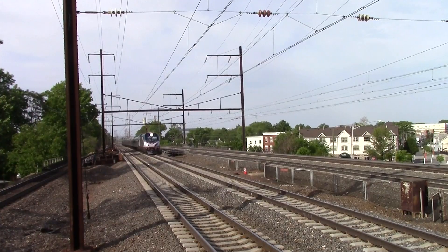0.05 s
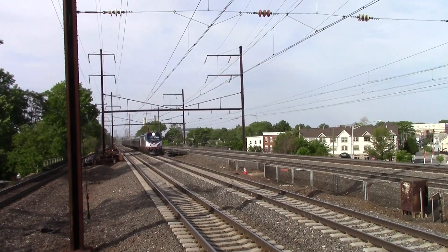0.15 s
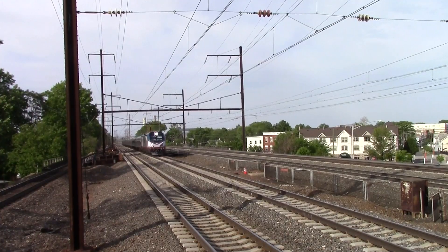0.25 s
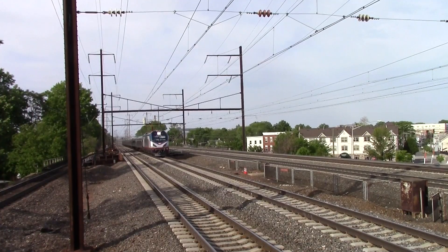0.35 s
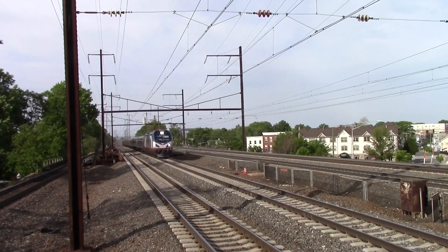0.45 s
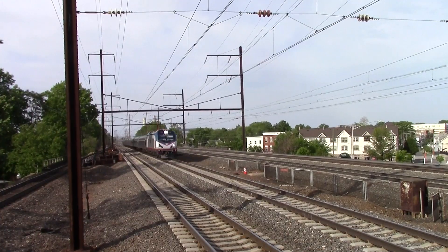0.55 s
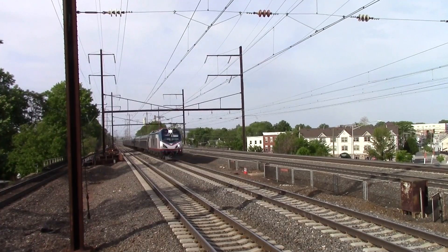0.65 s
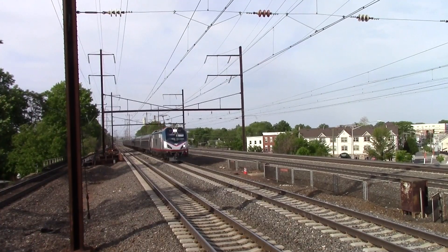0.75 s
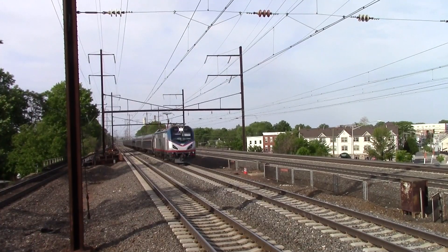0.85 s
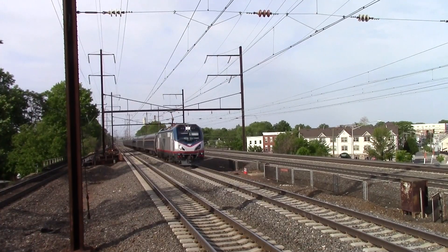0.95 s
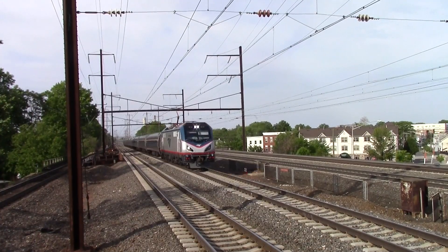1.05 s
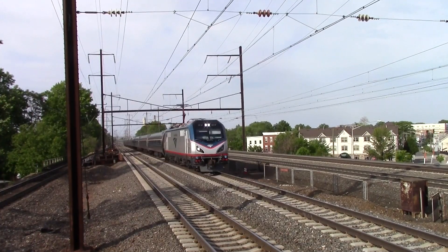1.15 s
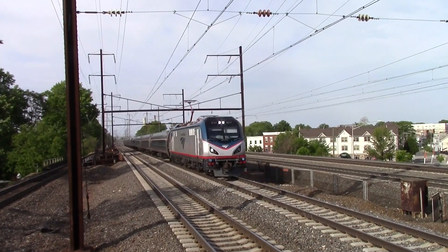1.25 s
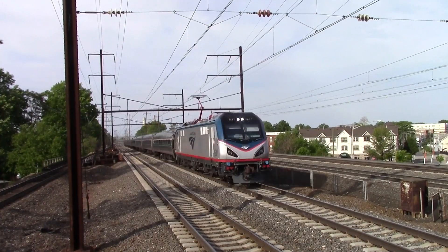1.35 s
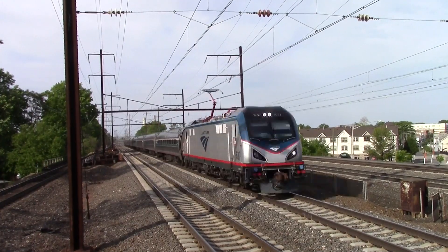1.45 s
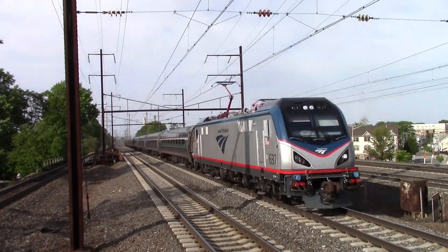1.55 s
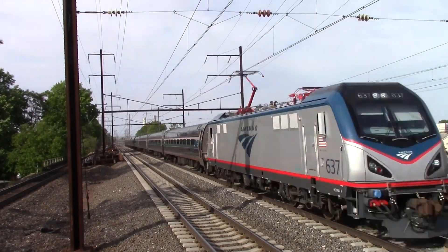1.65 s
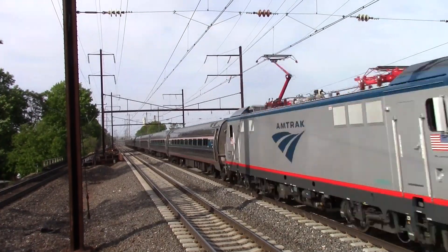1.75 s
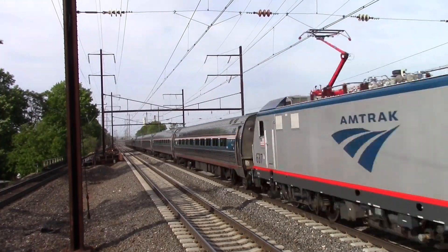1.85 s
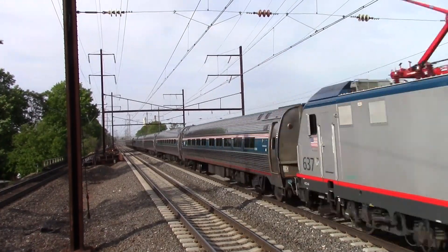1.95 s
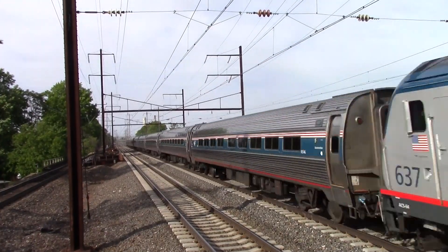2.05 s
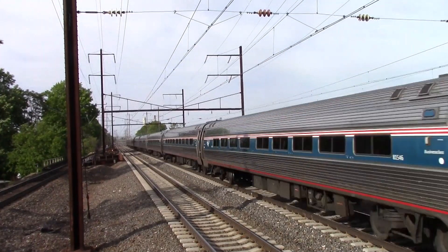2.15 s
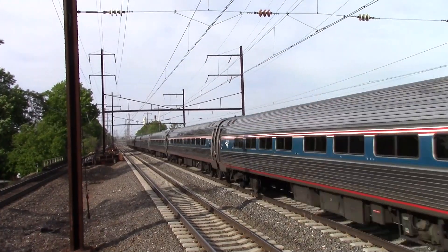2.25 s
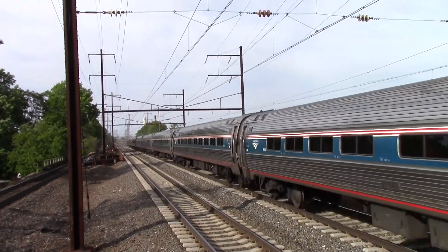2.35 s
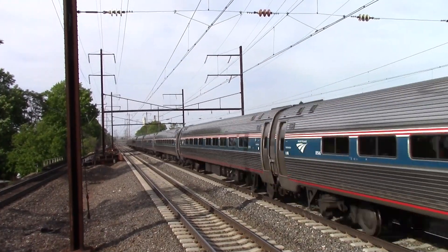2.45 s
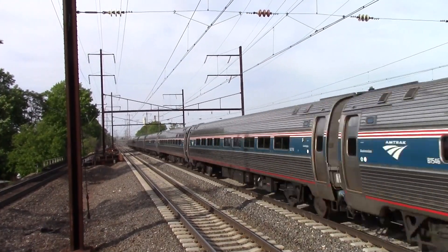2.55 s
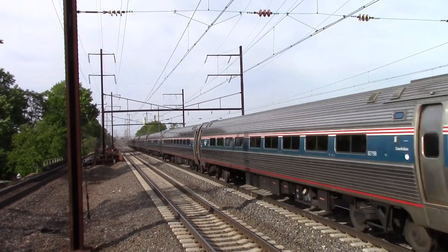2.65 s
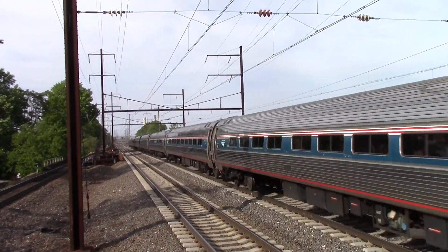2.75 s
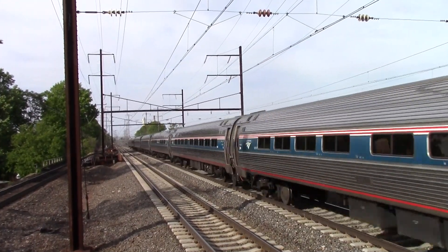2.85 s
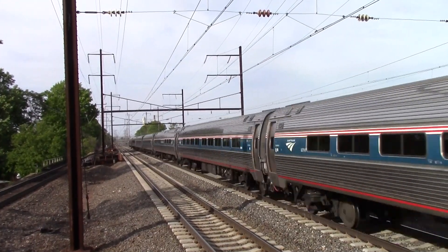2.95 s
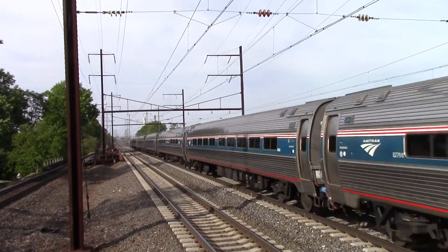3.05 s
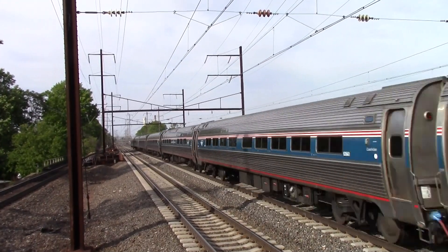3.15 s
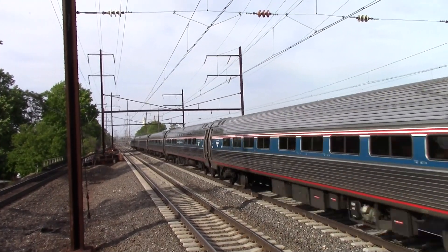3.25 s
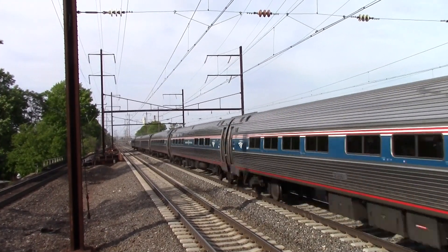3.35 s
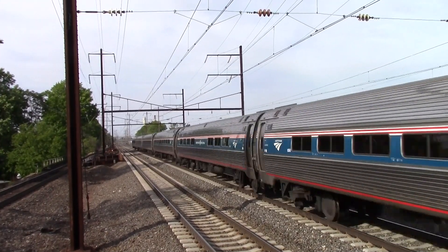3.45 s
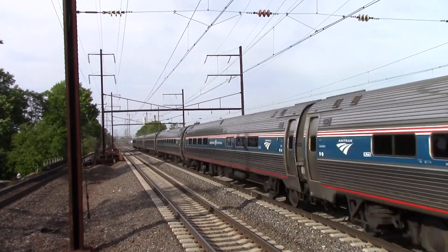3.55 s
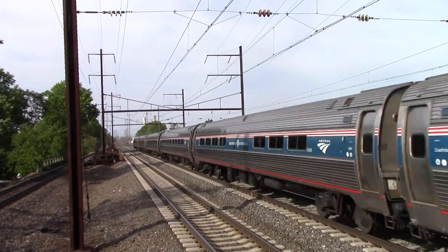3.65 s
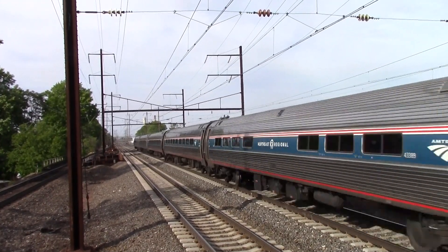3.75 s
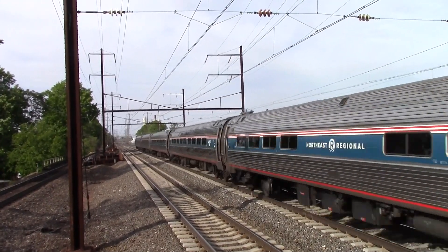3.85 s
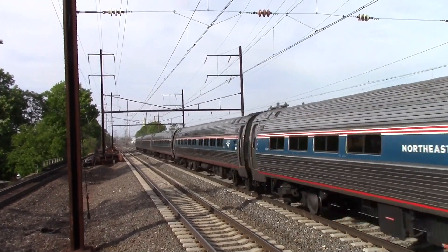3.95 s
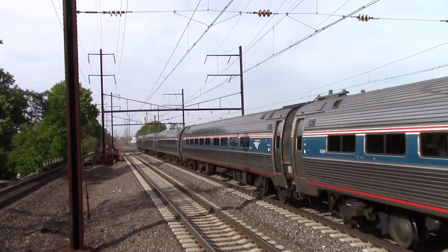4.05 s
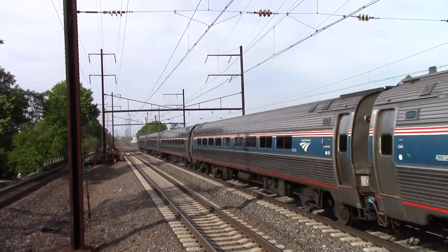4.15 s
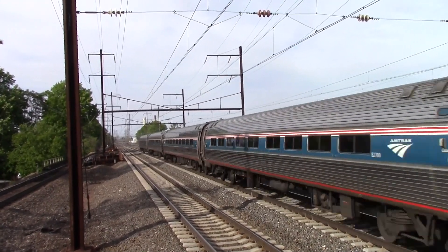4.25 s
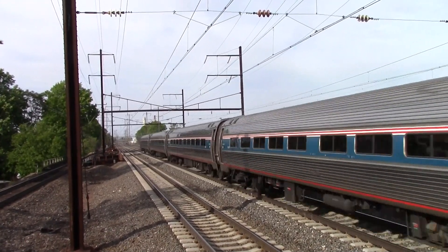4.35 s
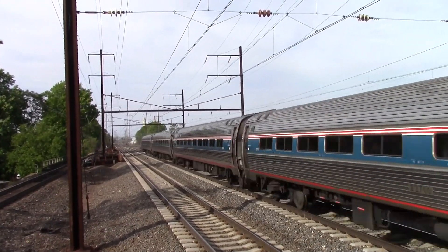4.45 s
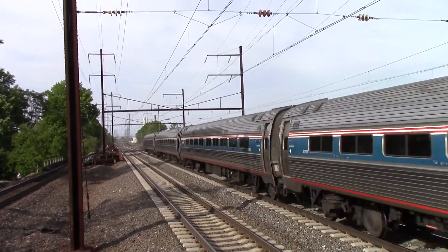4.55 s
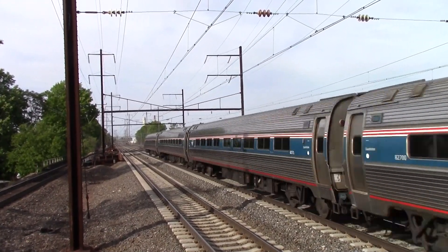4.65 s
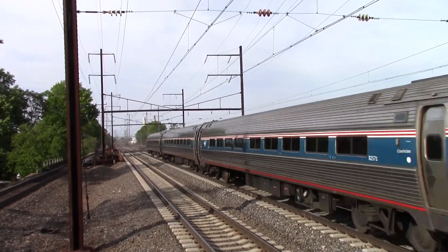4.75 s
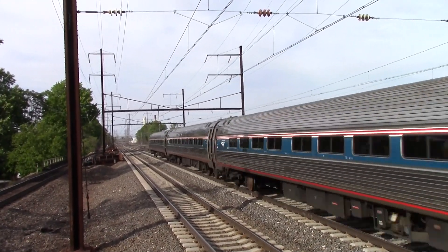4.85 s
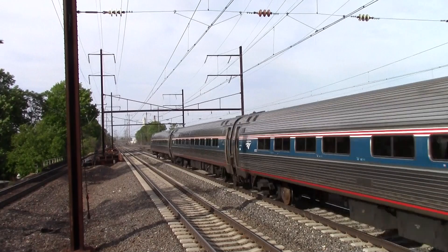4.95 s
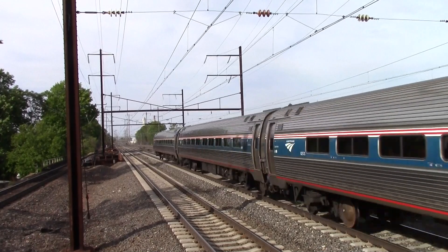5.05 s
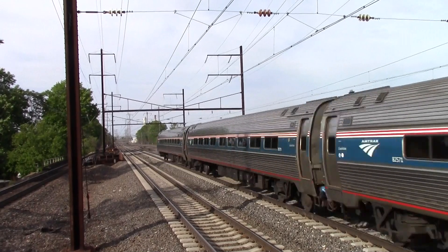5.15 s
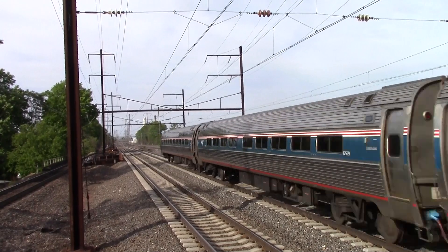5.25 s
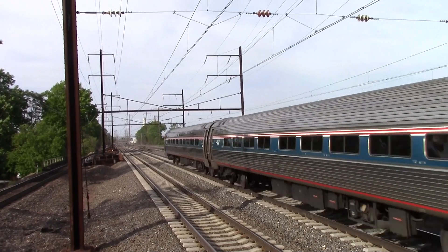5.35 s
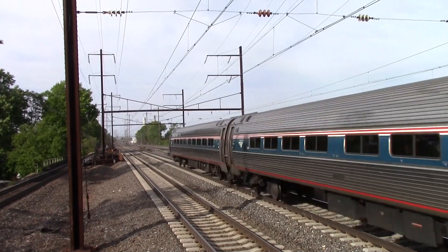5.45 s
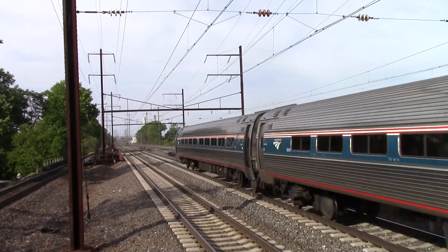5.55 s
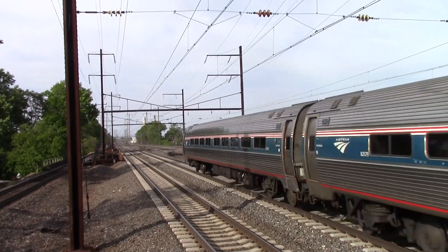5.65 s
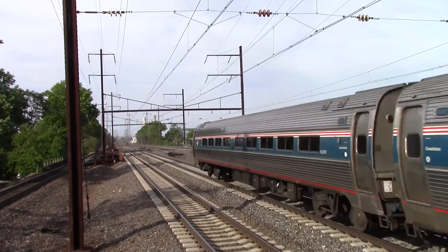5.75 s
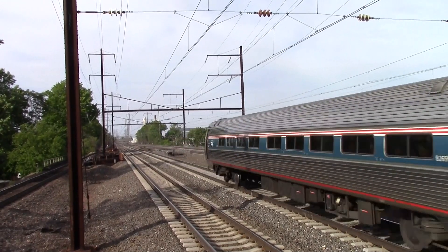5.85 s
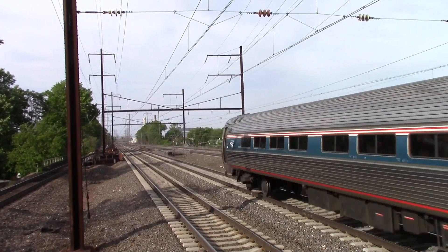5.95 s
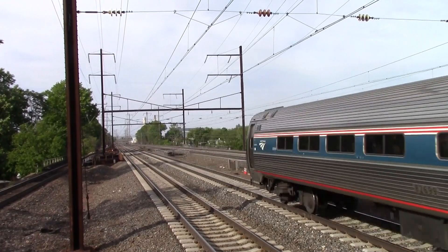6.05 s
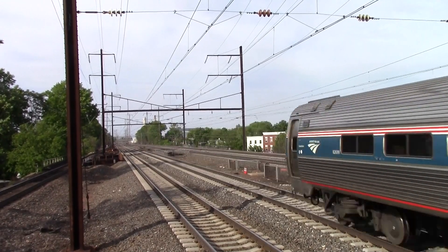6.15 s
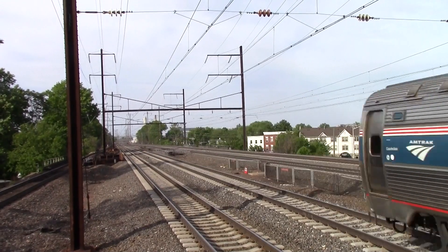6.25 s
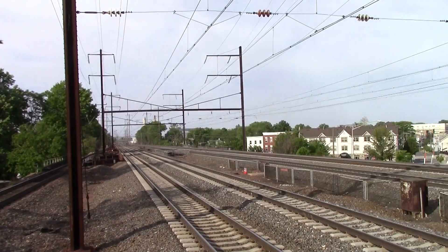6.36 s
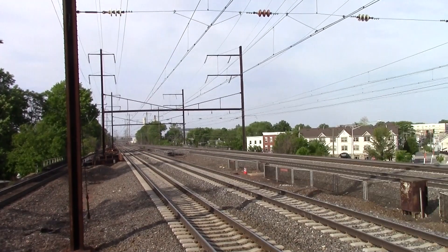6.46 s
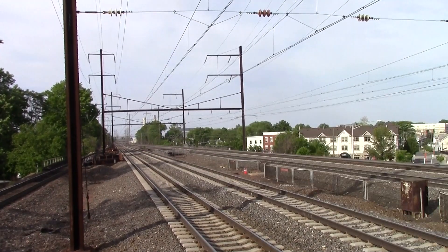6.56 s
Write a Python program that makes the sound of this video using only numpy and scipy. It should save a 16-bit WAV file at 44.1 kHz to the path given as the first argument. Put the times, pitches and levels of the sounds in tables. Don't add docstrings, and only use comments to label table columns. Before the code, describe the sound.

Open air beside a railway line, heard through a small stereo camera microphone with steady hiss, faint high whistles and little bass. From 0 to 1 second the rails sing softly, a ghostly trace of an earlier horn fades, and distant wheel roar grows. At about 1.0 a brassy five-note horn bursts out, buzzing and fluttering, getting fuller until it breaks off around 1.9 with a slight drop in pitch. The locomotive sweeps past from 1.8 to 2.5 with a heavy rough roar, clanks and short motor whines. From 2.6 the roar settles lower while coaches pass, paired axles clacking over joints roughly twice a second, with ringing steel, loose knocks and air hissing at car ends. Bass thins from 2.75 to 4.2. After 5.4 the roar rises again, and dense, hard, overloaded clatter runs from 5.9 until the end near 6.6.

```python
import sys
import numpy as np
from scipy import signal
from scipy.fft import rfft, irfft, next_fast_len
from scipy.io import wavfile
from scipy.ndimage import uniform_filter1d, map_coordinates

SR = 44100
rng = np.random.default_rng(int(sys.argv[2]) if len(sys.argv) > 2 else 0)


def wav_record(signal):
    frames = np.transpose(np.atleast_2d(signal))
    bounded = np.clip(frames, -1, 1)
    quanta = np.round(bounded * 32767).astype(np.int16)
    wavfile.write(sys.argv[1], SR, quanta)


def volts(x):
    e = np.asarray(x, float) / 20
    return 10 ** e


N = 290751

# start and end in seconds, pitch in Hz, line width in Hz, level in dB.
WHINES = [(-.5, .6, 1410, 90, -40), (.35, 1.05, 1430, 90, -36.5), (.9, 1.0, 1120, 60, -33),
          (.2, .5, 1800, 150, -40), (.6, 1.0, 1135, 50, -42), (1.9, 1.985, 1530, 150, -11),
          (1.87, 1.9, 1950, 500, -14), (1.97, 2.06, 700, 60, -29), (2.09, 2.15, 1500, 200, -13.5),
          (2.17, 2.23, 1560, 200, -13.5), (2.12, 2.24, 1310, 150, -19), (2.25, 2.36, 1430, 220, -16),
          (2.35, 2.43, 1310, 150, -17), (2.31, 2.355, 2500, 200, -17), (2.26, 2.42, 1720, 220, -20),
          (1.78, 1.9, 3250, 80, -27), (2.38, 2.6, 2250, 130, -24), (4.77, 4.85, 8450, 500, -36),
          (5.47, 5.56, 8600, 500, -40), (5.55, 5.72, 7900, 500, -41), (6.0, 6.07, 8300, 500, -36),
          (6.33, 6.45, 8400, 550, -37), (1.79, 1.89, 1550, 300, -19), (.25, .48, 1740, 60, -43),
          (.68, .95, 1750, 120, -38), (2.39, 2.44, 2200, 120, -19), (2.5, 2.56, 2200, 120, -21),
          (1.98, 2.07, 1500, 250, -20), (5.45, 5.8, 2160, 110, -27), (6.1, 6.7, 2240, 160, -22.5),
          (6.28, 6.56, 1690, 120, -26), (5.9, 6.05, 1410, 70, -29)]
# start and end in seconds, pitch and width in Hz, level in dB.
BLAST_ECHOES = [(-.1, 0.21, 375, 14, -61), (-.1, .12, 440, 14, -56), (0.139, .32, 440, 29, -54.5),
                (.15, 0.34, 310, 19.5, -67), (.15, 0.27, 500, 38, -60)]
# time in seconds, roar between bogies in dB.
NEARNESS = [(0, -38), (.29, -33), (.62, -33), (.96, -21), (1.25, -14.5), (1.62, -12.5), (1.76, -12.5),
            (1.9, -13.5), (2.24, -11), (2.43, -16), (2.6, -19), (2.77, -24.5), (2.85, -22), (3.1, -24.5),
            (3.65, -25.5), (3.85, -24), (4.3, -25.5), (5.2, -26.5), (5.55, -20.5), (6.0, -18), (6.59, -20)]
# time in seconds, head-on share, locomotive share.
ROAR_MIX = [(0, 1, 0.14), (1.2, 0.2, 0.77), (1.75, 0.48, 0.51), (1.95, 0.16, 0.71), (2.4, 0.33, 0.93),
            (2.72, 0.027, 0.071), (2.76, 0.092, 0.032), (6.6, 0.11, 0.16)]
# frequency in Hz, level in dB per Hz.
HEAD_ON_COLOUR = [(110, -48), (210, -28), (350, -19), (690, -11), (760, -5.5), (1110, 0), (1390, -1),
                  (1760, -1.5), (2500, -7), (3500, -10), (4600, -14.5), (5400, -31), (7000, -61),
                  (9000, -80)]
# frequency in Hz, level in dB per Hz.
LOCO_COLOUR = [(210, -59), (350, -20), (473, -26), (615, -25), (720, -11.5), (930, -15.5), (1110, -13),
               (1500, -2.5), (1850, -4.5), (2770, -5.5), (3840, -14.5), (7000, -25), (9100, -31),
               (15400, -120)]
# frequency in Hz, level in dB per Hz.
COACH_COLOUR = [(260, -64), (450, -47), (535, -38), (635, -20), (818, -13), (1190, -10), (1590, -2),
                (1810, -2.5), (2070, 0), (2580, -4.5), (2990, -5.5), (3400, -14.5), (7000, -16),
                (9100, -24), (15400, -120)]
# frequency in Hz, width in Hz, strength in dB.
WHEEL_MODES = [(760, 90, -11), (1000, 90, -12), (1670, 90, -5), (1960, 90, -10), (2140, 80, -1),
               (2260, 90, -1), (2550, 100, -9), (2950, 120, -8), (3450, 140, -10)]
# frequency in Hz, level in dB per Hz.
RUMBLE_COLOUR = [(82, -71), (140, -26), (246, -16), (360, -8), (459, -4.5), (613, 1), (650, 7.5),
                 (840, -10), (1430, -120)]
RUMBLE_BAND = (230, 340)
# frequency in Hz, level in dB per Hz.
AIR_COLOUR = [(2060, -32), (3500, 0.5), (3800, -3.5), (4580, -5), (6130, -8.5), (7430, -7), (10300, -16),
              (12000, -23), (13000, -27), (15500, -76)]
# frequency in Hz, level in dB per Hz.
GLINT_COLOUR = [(7000, -20.5), (9000, -4), (12000, -13), (14000, -15), (15000, -20), (15600, -60)]
# time in seconds, glint level in dB, hiss rise in dB.
CAR_ENDS = [(.85, -62, 0), (1.15, -65, 0), (1.45, -61, 2), (1.65, -55, 4.5), (1.85, -44, 6),
            (2.05, -50, -0.5), (2.37, -51, 2), (2.69, -53.5, 6), (3.25, -63, 4), (3.78, -60, -7),
            (4.28, -61, 12), (4.47, -72, 10.5), (4.82, -57, 11), (5.0, -63, 10), (5.36, -61, -22),
            (5.52, -56, 5), (5.9, -56, -6), (6.04, -53, 2.5), (6.4, -52, 1.5)]
# frequency in Hz, level in dB per Hz.
CAMERA_MID_COLOUR = [(3240, -24), (5500, -26), (10100, -9), (11000, -5), (12000, -14), (12900, -8),
                     (13900, -30), (14500, -60)]
# frequency in Hz, level in dB per Hz.
CAMERA_SIDE_COLOUR = [(2650, -27), (4500, -28), (4940, -5.5), (7590, -6), (8640, -16), (9290, 4.5),
                      (11400, 2.5), (15500, -11)]
# pitch in Hz, level in dB.
DRIVE_WHISTLES = [(9650, -67), (10900, -80), (11500, -78), (12450, -80), (12900, -84)]
# time in seconds, level in dB, overtone boost in dB.
BLAST = [(.995, -52, 2), (1.008, -8.5, -3), (1.2, -3.5, -4.5), (1.35, -0.4, -3.5), (1.7, 0.5, -3),
         (1.74, -3.5, -24), (1.85, -1, -2), (1.92, -14, -16), (2.3, -62, -6)]
BELLS = [365.3, 434, 502, 574.5, 703]
BELL_SAG = [1.7, 2.2, .6, 1, .8]
BELL_END = [1.82, 1.74, 1.74, 1.87, 1.85]
OVERTONES_FAR = [(-33, -49, -31, -44, -31, -36, -37, -29), (-34, -32, -29, -41, -30, -44, -37, -38.5),
                 (-27, -26, -34, -29, -29, -34, -47, -54), (-38, -33, -28, -39, -37, -31, -47, -47),
                 (-35.5, -31, -29.5, -28, -31, -36, -43, -47)]
OVERTONES_CLOSE = [(-34, -26, -15, -20, -33, -41, -41, -39), (-30.5, -21.5, -33, -28, -32, -46, -31, -37.5),
                   (-29.5, -22.5, -21.5, -27.5, -26.5, -34, -44, -47),
                   (-30, -33, -31, -45, -36, -42, -51, -46), (-28, -25.5, -31, -25.5, -34, -47, -49, -45)]
# time in seconds, share of the close colour.
CLOSING = [(1.2, 0.2), (1.5, 0.83)]
# time in seconds, pitch factor.
DOPPLER = [(.9, .97), (.95, 1.004), (1.3, 1.001), (1.55, .998), (1.71, .994), (1.76, .985), (2.2, .97)]
# time in seconds, peak in dB, thud in dB, rattle length in seconds.
AXLES = [(1.859,-3,-12.5,0.053),(1.93,-23,-25,.08),(2.051,-6,-9,0.036),(2.076,-27,-21,.023),(2.457,-11,-9,.019),(2.509,-17,-23,.02),
         (2.634,-5,-16,0.041),(2.685,-6.5,-28,0.031),(2.977,-8,-17,0.015),(3.029,-8.5,-21,0.021),(3.156,-8,-21.5,0.047),(3.211,-9,-27.5,0.082),
         (3.339,-6,-19.5,0.05),(3.392,-6.5,-21.5,0.042),(3.692,-13.5,-23,.022),(3.733,-10,-26.5,0.048),(3.874,-16,-31,0.078),(3.914,-7,-25.5,0.042),
         (4.211,-5.5,-24,0.044),(4.265,-10.5,-28,0.035),(4.39,-12,-25,.03),(4.439,-8,-20,0.037),(4.55,-7,-22,0.035),(4.605,-6.5,-23,0.025),
         (4.729,-7.5,-30,0.041),(4.78,-10,-25,0.037),(4.917,-6,-19,0.036),(4.968,-8.5,-22,0.044),(5.258,-9,-14,0.035),(5.315,-13,-23,0.018),
         (5.398,-31,-20,0.02),(5.443,-4.5,-17.5,0.03),(5.788,-4.5,-15,0.049),(5.846,-12,-29,0.016),(5.947,-3.5,-18,0.029),(6.003,-4,-17,0.053),
         (6.131,-1.5,-15,0.037),(6.182,0,-17.5,0.058),(6.312,-1.5,-14,0.039),(6.358,-8,-20,0.078),(6.412,-3,-19,0.045),(6.466,-6,-19,0.023),
         (6.522,-2.5,-27,0.035),(6.578,-5,-15,0.017)]
# time in seconds, peak in dB, thud in dB, rattle length in seconds.
KNOCKS = [(1.999, -2.5, -12, 0.024), (2.794, -9.5, -29, 0.051), (2.844, -14.5, -30, 0.054),
          (2.881, -10, -28, 0.019), (3.837, -16, -30, 0.056), (4.825, -10.5, -27, 0.016),
          (5.34, -22, -28, 0.019), (3.499, -10, -15.5, 0.018), (4.338, -17.5, -29, .012),
          (3.64, -23, -18, .007), (4.076, -6.5, -27, 0.027), (4.368, -8, -32, 0.12),
          (4.871, -12.5, -40, 0.025), (5.023, -15.5, -23, 0.079), (5.102, -10.5, -25, 0.021),
          (5.493, -12, -9, 0.045), (5.555, -7, -26, 0.006), (3.176, -8, -27, 0.007),
          (5.611, -10.5, -9, .01), (6.479, -1, -20, 0.012), (5.718, -23, -7, 0.02), (5.972, -1, -14, 0.031),
          (6.242, -9.5, -17, 0.13), (6.5, -0.5, -12, 0.023)]
# frequency in Hz, level in dB per Hz.
CLACK_COLOUR = [(210, -60), (350, -26.5), (780, -1), (1290, -2.5), (1540, 1), (2160, 0), (2690, -1.5),
                (3040, -2.5), (3290, -6), (4630, -13), (6150, -14.5), (9000, -25), (11700, -36),
                (19800, -120)]
# time in seconds, peak in dB, ring in Hz.
TICKS = [(2.458, -3, 1660), (2.5132, -10, 2130), (2.7942, -9.5, 2470), (2.8494, -7, 2260),
         (3.032, -8.5, 2960), (3.1562, -8, 2270), (3.1742, -7, 1690), (3.1804, -11, 2110),
         (3.2139, -4, 2200), (3.3418, -10, 2170), (3.3937, -14, 2160), (3.6341, -17, 2140),
         (3.694, -10.5, 1500), (4.2138, -9, 2120), (4.3445, -11, 2130), (4.3939, -8, 2340),
         (4.9172, -9, 2150), (4.9688, -6.5, 3040), (5.026, -10.5, 2150), (5.1055, -11, 2230),
         (5.2592, -9, 1720), (5.447, -6, 2260), (5.4984, -11, 1640), (5.5538, -4, 2120), (5.614, -7, 2060),
         (5.6635, -14, 2160), (5.7306, -10, 1600), (5.7921, 1, 1630), (6.057, -10, 1910),
         (6.1335, 3.5, 2244), (6.1414, -3, 2250), (6.1858, -12, 2170), (6.4224, -3, 1670),
         (6.4664, -2, 2150), (6.5824, -0.5, 2080)]
# time in seconds, level in dB.
THUMPS = [(2.468, -56), (2.535, -58), (2.593, -55), (2.65, -61), (2.703, -62), (2.813, -62), (3.214, -57),
          (3.341, -60), (3.409, -57), (3.927, -60), (4.214, -51), (4.372, -61), (4.393, -52), (4.446, -62),
          (4.555, -56), (5.449, -50), (5.503, -61), (5.543, -62), (5.619, -64), (5.695, -65), (5.805, -55),
          (5.831, -57), (5.856, -59), (5.985, -52), (6.006, -56), (6.032, -52), (6.142, -48), (6.172, -59),
          (6.194, -41), (6.27, -60), (6.317, -49), (6.354, -58), (6.421, -53), (6.508, -55), (6.556, -59),
          (6.582, -44)]
# frequency in Hz, level in dB per Hz.
WIDE_COLOUR = [(880, -44), (1500, -28), (1640, -34), (2200, -4), (2700, -27), (2940, -8), (6010, 4.5),
               (11000, -3.5), (13900, -12.5), (15500, -24)]
# frequency in Hz, share of the lean.
LEAN = [(900, .0), (1800, 0.23), (2800, 0.8), (4000, 1.16), (5000, 1.5), (7000, 0.65), (9500, 1.1),
        (12000, .0)]
# frequency in Hz, quarter-cycle share.
LAG = [(4200, 0.0053), (6000, 0.14), (9000, 0.47), (11000, 0.34)]
# frequency in Hz, gain in dB.
WIND_CUT = [(150, 3), (300, -4.5), (420, -8), (560, -4), (690, .0)]
# time in seconds, share.
WIND_ON = [
    (2.72, 0),
    (2.75, 1),
    (4.15, 1),
    (4.25, 0),
]


def unit(x):
    return x / np.sqrt(np.mean(x ** 2) + 1e-20)


def along(points, hz):
    f, v = np.transpose(points)
    return np.interp(np.log(hz + 1), np.log(f + 1), v)


def curves(rows):
    s, *cols = np.transpose(rows)
    return [np.interp(np.arange(N) / SR, s, c) for c in cols]


def wobble(rate, first=0, last=N):
    knots = rng.standard_normal(int(N * 600 / SR) + 4)
    return map_coordinates(knots, [np.arange(first, last) * min(rate, 600) / SR])


def bumps(times, width_s):
    t = np.arange(0, N + 64, 64) / SR
    swells = sum(np.exp(-((t - s) / width_s) ** 2) for s in times)
    return np.interp(np.arange(N) / SR, t, swells)


def filtered(x, response):
    m = next_fast_len(len(x) + 8192)
    return irfft(rfft(x, m) * response(np.fft.rfftfreq(m, 1 / SR)), m)[:len(x)]


def rush(spectrum, patchy_db, band=(0, 22050)):
    z = signal.stft(rng.standard_normal(N + 512), nperseg=512)[2]
    field = uniform_filter1d(rng.standard_normal(z.shape), size=2, axis=0)
    field = uniform_filter1d(field, size=7, axis=1)
    patchy = signal.istft(z * volts(patchy_db * unit(field)), nperseg=512)[1][:N]
    x = filtered(patchy, lambda hz: volts(along(spectrum, hz)))
    return x / np.std(filtered(x, lambda hz: (hz > band[0]) & (hz < band[1])))


def resonances(hz, boost_db):
    return 1 + sum(volts(db + boost) * 1j * hz * width / (centre ** 2 - hz * hz + 1j * hz * width)
                   for (centre, width, db), boost in zip(WHEEL_MODES, boost_db))


def strikes():
    return AXLES + KNOCKS


def whines():
    out = np.zeros(N)
    for start, end, hz, width_hz, db in WHINES + BLAST_ECHOES:
        first, last = max(round(start * SR), 0), min(round(end * SR), N)
        u = np.clip((np.arange(first, last) / SR - start) / (end - start), 0, 1)
        carrier = np.exp(2j * np.pi * np.cumsum(hz * (1 - .015 * u)) / SR)
        blur = .35 + wobble(width_hz, first, last) + 1j * wobble(width_hz, first, last)
        out[first:last] += volts(db) * np.sqrt(np.abs(np.sin(np.pi * u))) * (carrier * blur).real
    return out


def wheel_roar(far, loco):
    coach = filtered(rush(COACH_COLOUR, patchy_db=3.0), lambda hz: resonances(hz, np.full(len(WHEEL_MODES), -3.)))
    roar = np.sqrt(far) * rush(HEAD_ON_COLOUR, patchy_db=2.0)
    roar += np.sqrt(loco) * rush(LOCO_COLOUR, patchy_db=3.0)
    return roar + np.sqrt(np.clip(1 - far - loco, 0, 1)) * unit(coach)


def rumble(level_db, far, loco, shake, wheels):
    db = -60.5 + 1.97 * (level_db + 20.5)
    db += 6 * far - 11.5 * loco
    db += -22 * curves(WIND_ON)[0]
    db += -9 * bumps([3.7], .13)
    return volts(db + 0.64 * shake + 10 * wheels) * rush(RUMBLE_COLOUR, patchy_db=3.5, band=RUMBLE_BAND)


def torn_air(level_db, shake, wheels):
    gaps = sum(rise_db * bumps([s], 0.07) for s, _, rise_db in CAR_ENDS)
    hiss_db = -40.5 + 1.32 * (level_db + 21.5) + 1.5 * wheels + gaps
    hiss = volts(hiss_db + 0.19 * shake) * rush(AIR_COLOUR, patchy_db=2.5, band=(5000, 9000))
    ends = sum(volts(db) * bumps([s], 0.12) for s, db, _ in CAR_ENDS)
    return hiss + ends * rush(GLINT_COLOUR, patchy_db=-4.0, band=(12000, 15500))


def rolling():
    level_db, = curves(NEARNESS)
    far, loco = np.clip(curves(ROAR_MIX), 0, 1)
    wheels = np.tanh(bumps(np.array(AXLES)[:, 0] + 0.019, 0.018))
    shake = np.clip(1 - 0.32 * far, 0, 1) * (0.78 * wobble(18) + 0.091 * wobble(65))
    roar = volts(level_db + 1.5 * wheels + shake - 1.0) * wheel_roar(far, loco)
    return roar + rumble(level_db, far, loco, shake, wheels) + torn_air(level_db, shake, wheels)


def camera_noise():
    t = np.arange(N) / SR
    whistle = sum(volts(db + 2.5 * wobble(30)) * np.sin(2 * np.pi * hz * t + 1.5 * wobble(40))
                  for hz, db in DRIVE_WHISTLES)
    mid = volts(-56.5) * rush(CAMERA_MID_COLOUR, patchy_db=-4.0) + .8 * whistle
    side = volts(-45.0) * rush(CAMERA_SIDE_COLOUR, patchy_db=2.5) + 1.5 * whistle
    return mid, side


def horn():
    first, count = int(.95 * SR), int(1.2 * SR)
    rows = np.array(curves(BLAST) + curves(DOPPLER) + curves(CLOSING))
    level_db, boost_db, doppler, close = rows[:, first:first + count]
    close = np.clip(close, 0, 1)
    t = (first + np.arange(count)) / SR

    def chance(knots):
        return np.interp(np.arange(count), np.linspace(0, count, num=knots), rng.standard_normal(knots))

    out = np.zeros(N)
    for hz, sag, end, *levels in zip(BELLS, BELL_SAG, BELL_END, OVERTONES_FAR, OVERTONES_CLOSE):
        pitch = hz * doppler ** sag * (1 + .0005 * chance(knots=25))
        phase = 2 * np.pi * np.cumsum(pitch) / SR
        overtones = np.transpose([[*row] + [row[-1] - 0.94 * k for k in range(1, 5)] for row in levels])
        blown = level_db + 3.5 - 18 * np.clip((t - end) / .03, 0, 1)
        for k, (far_db, close_db) in enumerate(overtones, start=1):
            db = far_db + close * (close_db - far_db)
            db = db + 3.5 * (k * hz > 1300)
            rough = 2.2 if k * hz < 900 else .8
            flutter = 1.4 * chance(knots=12) + rough * chance(knots=40)
            jitter = .15 * rough * chance(knots=40) + rng.uniform(0, 2 * np.pi)
            level = volts(blown + db + (k > 1) * boost_db + flutter)
            out[first:first + count] += level * np.sin(k * phase + jitter)
    return out


def axles():
    out, t = np.zeros(N + SR), np.arange(SR // 5) / SR
    modes = len(WHEEL_MODES)
    for s, db, thud_db, length in strikes():
        boost_db = 5 + 4 * rng.standard_normal(modes)
        swell = np.exp(-(t / length) ** 2.5) + .2 * np.exp(-t / .045) + .3 * np.exp(-t / .004)
        swell *= 1 - np.exp(-t / 0.0017)

        def tone(hz):
            return volts(along(CLACK_COLOUR, hz) + (thud_db + 18) * (hz < 1050)) * resonances(hz, boost_db)

        ring = swell * unit(filtered(rng.standard_normal(len(t)), tone))
        out[round(s * SR):][:len(t)] += volts(db - 2.0) * 0.31 * ring
    return filtered(out[:N], lambda hz: 1 / (1 + (420 / (hz + 1)) ** 6))


def ticks():
    out, t = np.zeros(N + SR), np.arange(SR // 20) / SR
    for s, db, hz in TICKS:
        ring = volts(-60 * t / 0.045) * np.sin(2 * np.pi * hz * t)
        crack = 0.22 * volts(-60 * t / 0.005) * rng.standard_normal(len(t))
        out[round(s * SR):][:len(t)] += volts(db - 5.5) * (ring + crack)
    return filtered(out[:N], lambda hz: 1 / (1 + (900 / (hz + 1)) ** 8) / (1 + (hz / 7000) ** 2))


def low_thumps():
    out, t = np.zeros(N + SR), np.arange(SR // 20) / SR
    jolt_s = .0007
    for s, db in THUMPS:
        out[round(s * SR):][:len(t)] += volts(db + 8.5) * t / jolt_s * np.exp(-t / jolt_s)
    return out[:N]


def scene():
    train = whines() + rolling() + horn() + axles()
    train = filtered(train, lambda hz: 1 / (1 + (170 / (hz + 1)) ** 4))
    train = train + ticks() + low_thumps()
    level_db, = curves(NEARNESS)
    coach_s, first_coupling_s, couplings = 0.52, 2.71, 8
    narrow_db = -8.5 * bumps(first_coupling_s + coach_s * np.arange(couplings), 0.11)
    blows = np.tanh(bumps([row[0] + .02 for row in strikes()], .03))
    wide_db = -47.5 + 0.5 * (level_db + 21) + narrow_db + 2 * blows
    wide = volts(wide_db) * rush(WIDE_COLOUR, patchy_db=-3.5, band=(10500, 14000))
    abreast = volts(curves([(1.78, -34), (2.05, .1)])[0])
    lean = np.tanh(2.5 / 18.0) * filtered(train, lambda hz: along(LEAN, hz))
    lag = volts(0.4 * narrow_db) * filtered(train, lambda hz: -1j * along(LAG, hz))
    own_mid, own_side = camera_noise()
    mid = train + (1 - 0.32 * abreast) * own_mid
    side = abreast * (lean + lag + wide)
    side += volts(-0.0068 * (level_db + 39)) * own_side
    side = filtered(side, lambda hz: 1 / (1 + (hz / 14700) ** 30))
    return np.array([mid + side, mid - side])


def top_cut(x):
    return signal.sosfilt(signal.butter(12, 15650, fs=SR, output="sos"), x)


def record(dry):
    cut = np.array([filtered(port, lambda hz: volts(along(WIND_CUT, hz))) for port in dry])
    bent = dry + curves(WIND_ON)[0] * (cut - dry)
    bent = bent + .014 * np.minimum(np.abs(bent), 1) ** 9
    bent = bent / (1 + np.abs(bent / 1.02) ** 5.5) ** (1 / 5.5)
    bent = signal.sosfilt(signal.butter(1, 15, "high", fs=SR, output="sos"), bent)
    return top_cut(bent)


dry = scene()
out = record(dry)
wav_record(out)
```